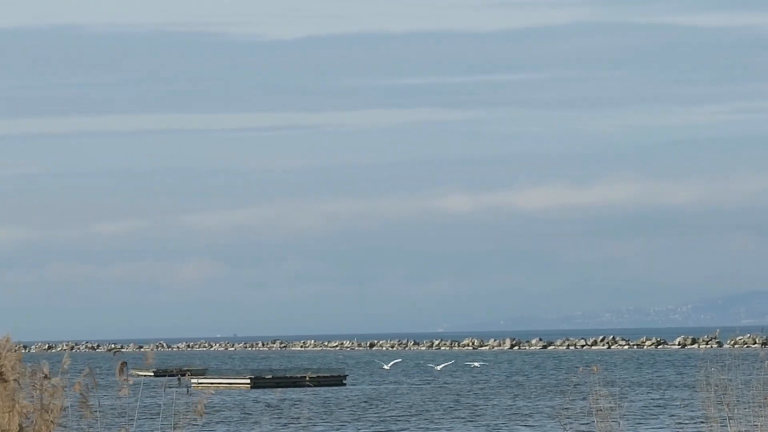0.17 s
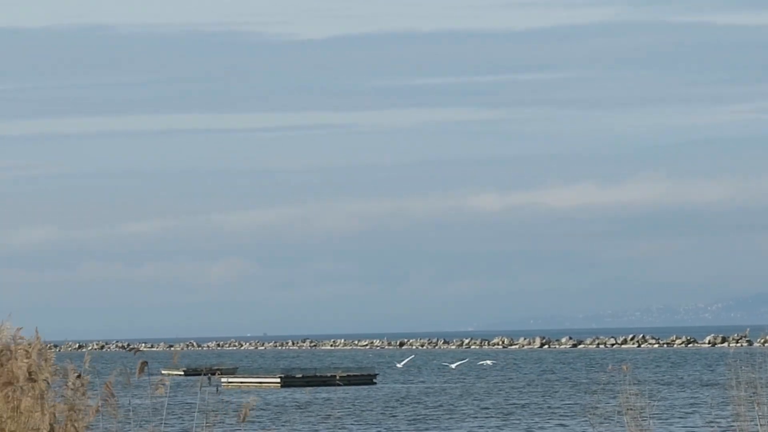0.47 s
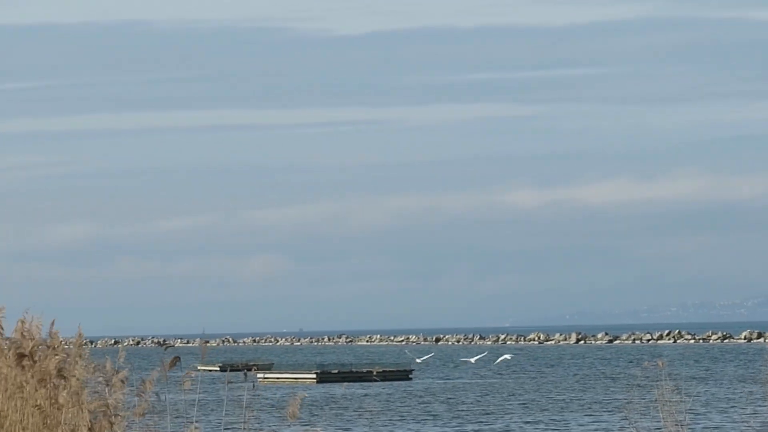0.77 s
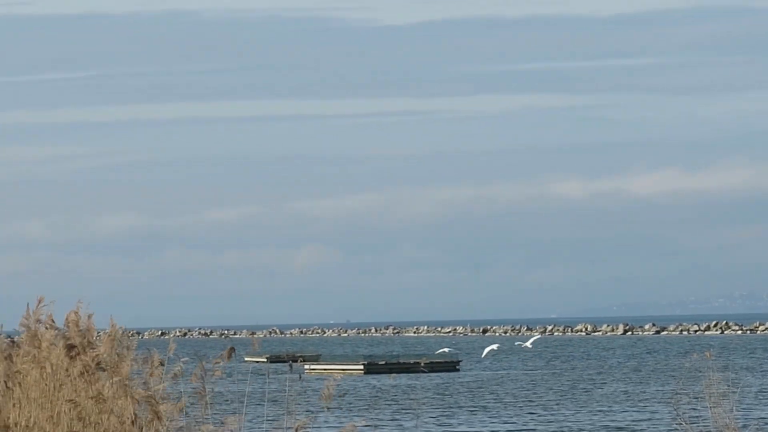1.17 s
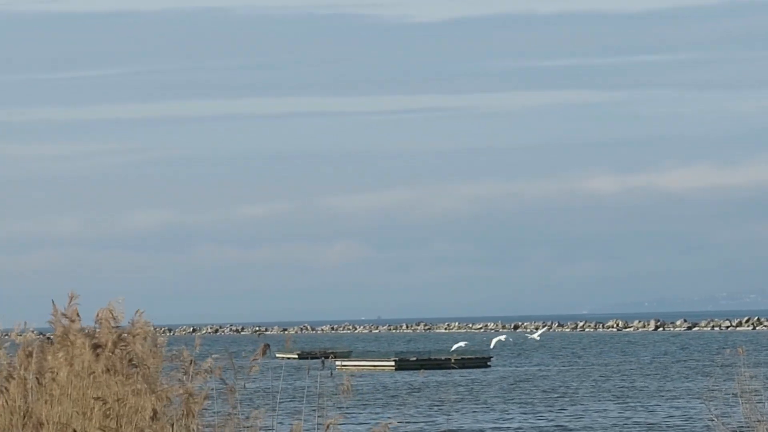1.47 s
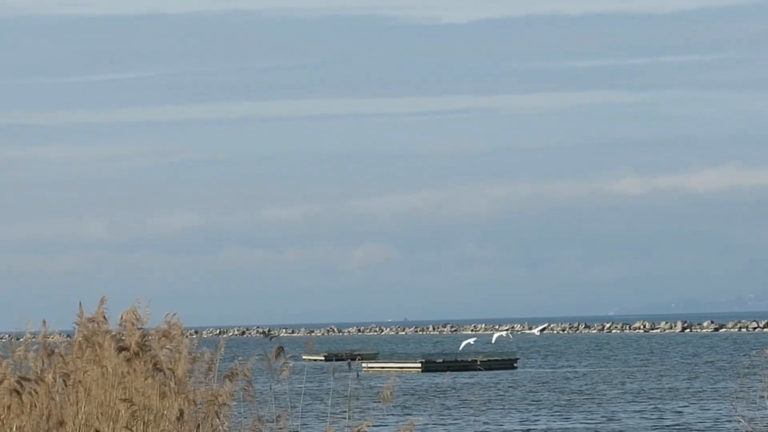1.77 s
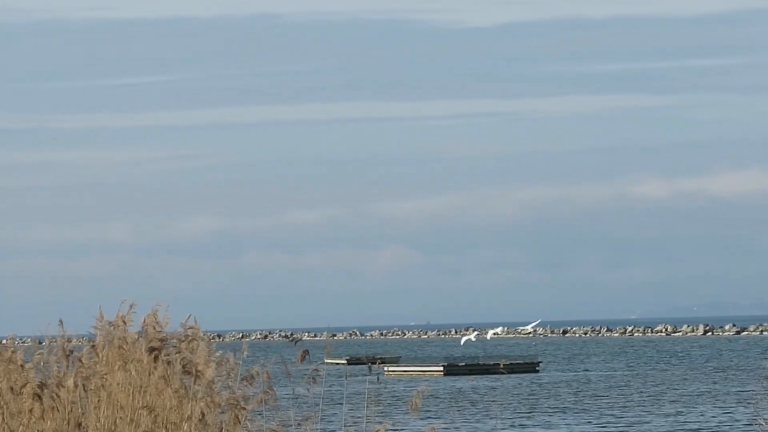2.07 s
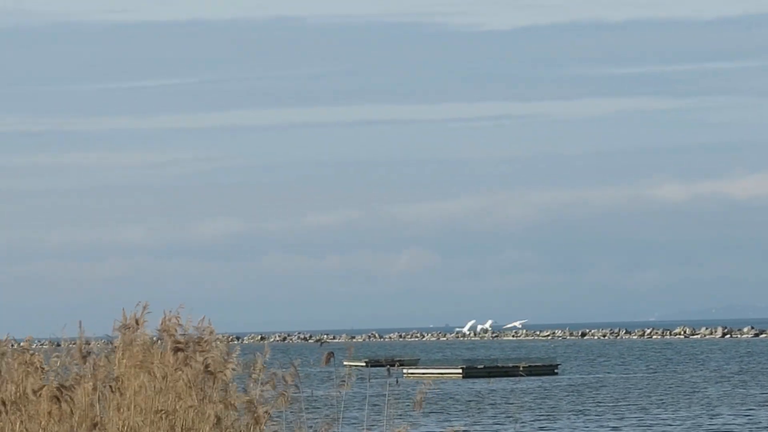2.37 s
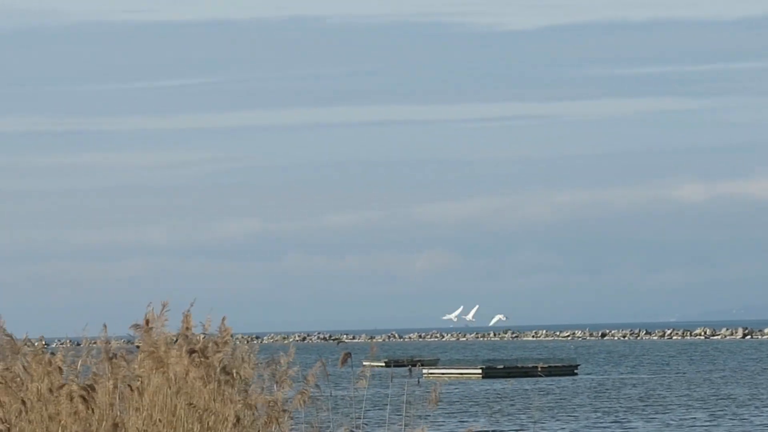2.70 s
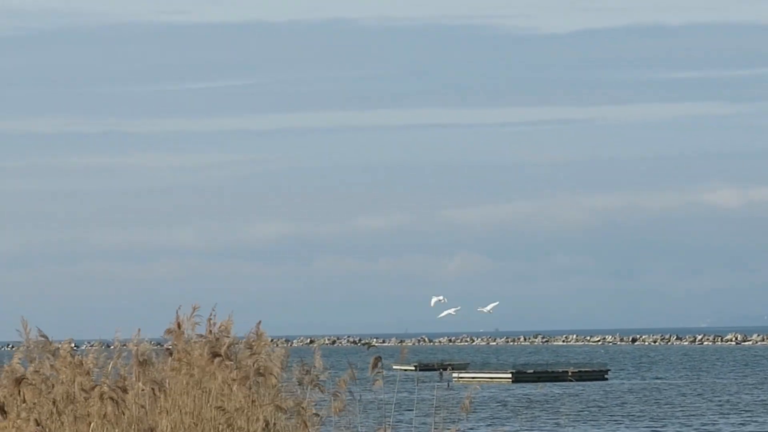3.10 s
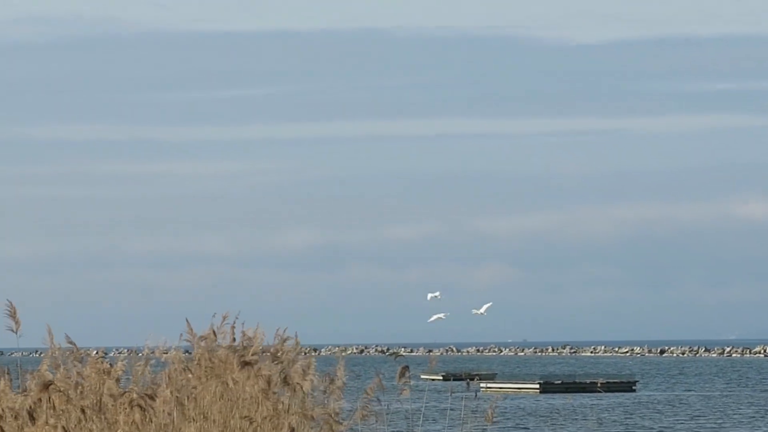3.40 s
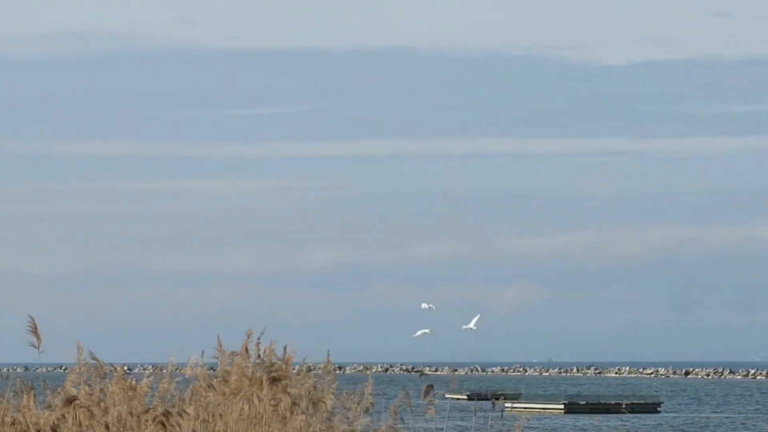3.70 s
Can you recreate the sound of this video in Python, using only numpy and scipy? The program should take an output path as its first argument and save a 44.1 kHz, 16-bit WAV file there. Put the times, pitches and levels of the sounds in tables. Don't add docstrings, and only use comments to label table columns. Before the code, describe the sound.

Wind rumbles and thumps against a small camera microphone on a lake shore, over faint buzzing

```python
import sys
import numpy as np
from scipy import signal
from scipy.fft import rfft, irfft, next_fast_len
from scipy.io import wavfile
from scipy.ndimage import uniform_filter1d, map_coordinates

SR = 44100
rng = np.random.default_rng(int(sys.argv[2]) if len(sys.argv) > 2 else 0)


def volts_from_db(level):
    exponent = np.asarray(level, float) / 20
    return 10 ** exponent


def log_audio(samples):
    frames = np.atleast_2d(samples).T
    limited = np.clip(frames, -1, 1)
    pcm = np.round(limited * 32767).astype(np.int16)
    wavfile.write(sys.argv[1], SR, pcm)


N = 169785
T = np.arange(N) / SR

# (start [s], end [s], shift to stretch time [s], gain [dB])
SHOWINGS = [
    (0, .271, 2.99998, 0),
    (.272, 1.568, 1.89998, -1.5),
    (1.472, 3.266, 0, 0),
    (2.905, 3.85, -.73333, -1.5),
]
SECOND_SHIFT_S = 1.89998
JOIN_S, FADE_FROM_S, FADE_DB_PER_S = .005, 3.62, -11.5

# (frequency [Hz], density [dB per Hz])
HISS_SPECTRUM = [(150, -120), (300, 15), (2500, -7.5), (3500, -3), (5000, -1), (9000, -4.5), (16000, -6)]
HISS_DB = -45

# (frequency [Hz], density [dB per Hz])
TWITTER_SPECTRUM = [(4300, -120), (4700, -2.5), (5100, -1), (5500, -1), (5900, -120)]
TWITTER_DB = -59.5

# (time in frame [ms], signed size [1])
FRAME_EDGES = [(0, .85), (.329, -1), (.38, .8), (.702, -.72), (.748, .88), (1.07, -.72), (1.206, 1),
               (1.665, .22), (2.11, -.16), (2.571, -.21), (3.03, -.85)]
FRAME_RATE_HZ, FRAME_START_S = 126.136, 1.65192
EDGE_DB, EDGE_SCATTER_DB, EDGE_DULL_HZ = -24.5, -2.5, 28400
BUSY_FROM_S, BUSY_TO_S, LATE_MS, LATE_SHARE = 2.535, 2.905, .113, .7

# (frequency [Hz], density [dB per Hz])
GRIP_SPECTRUM = [(250, -120), (500, 2), (950, -1), (1400, -7), (2500, -5), (2900, -16.5), (5300, -20),
                 (9000, -34), (12000, -120)]
GRIP_S, GRIP_LONG_S, GRIP_DB = 3.372, .099, -35

# (time [s], held [s], pitch [Hz], level [dB], falling tail [s])
CHIPS = [
    (1.474, .007, 3560, -46, .010),
    (1.739, .019, 3490, -44, .004),
    (2.116, .013, 3250, -51, .003),
    (2.280, .015, 3345, -46, .004),
    (2.760, .010, 3335, -43, .014),
]
CHIP_SAG_HZ_PER_S2, CHIP_SCOOP_HZ, CHIP_RISE_S = 1500000, 70, .005
CHIP_TAIL_DB_PER_S, CHIP_FLUTTER_DB = -500, 1.5

# (middle [s], length [s], level [dB])
WAVELETS = [(1.812, .03, -44.5), (1.884, .04, -43), (2.043, 0.018, -47), (2.07, 0.013, -48),
            (2.122, 0.041, -43.5), (2.181, 0.021, -42.5), (2.342, 0.038, -44.5), (2.405, 0.036, -44.5),
            (2.454, 0.03, -41.5), (2.668, 0.042, -49), (2.896, 0.029, -45.5), (2.921, .025, -42),
            (3.02, .04, -52), (3.154, 0.045, -45), (3.195, 0.033, -47), (3.248, 0.014, -40),
            (3.33, .03, -46), (3.369, .03, -37)]
# (frequency [Hz], density [dB per Hz])
SPLASH_SPECTRUM = [(500, -120), (900, 0), (1300, -1), (2100, 6.5), (2900, -6.5), (3500, -6), (4300, -13),
                   (6000, -120)]
WAVELET_LENGTH_SCALE, WAVELET_GRAIN_DB = .77, 3

# (time [s], level [dB])
WING_EFFORT = [(1.6, -40), (1.87, -38), (1.88, -37.5), (2.148, -42), (2.386, -36.5), (2.452, -41),
               (2.682, -39.5), (2.726, -40), (2.88, -42)]
# (time in the second showing [s], level [dB])
WING_EFFORT_END = [(1.0, -35.5), (1.11, -37), (1.208, -43.5), (1.258, -40), (1.274, -39.5), (1.46, -36.5)]
# (frequency [Hz], density [dB per Hz])
WASH_SPECTRUM = [(120, -40), (200, -10), (420, -8), (500, -9.5), (650, -3), (1000, -6.5), (1620, -16),
                 (3000, -28.5), (5200, -41), (8800, -120)]
# (tone [Hz], width [Hz], level [dB], a downstroke [s])
FEATHER_TONES = [
    (642.3, 40, 1, 2.364),
    (786.5, 53, -4, 2.6),
    (898, 140, -5, 2.25),
]
FEATHER_DB, FEATHER_FOLLOWS, WASH_DB, WASH_FOLLOWS = -4.5, .7, 3, .54
STROKE_S, STROKE_DEPTH_DB = .31, 4.5
SLAP_S, SLAP_LONG_S, SLAP_DB = 1.9, .027, 5

# (time [s], level [dB])
GUSTS = [(1.5, -28.5), (1.788, -25), (1.818, -26), (1.872, -26.5), (2.214, -19), (2.752, -24),
         (2.81, -17.5), (2.836, -23.5), (2.88, -23)]
# (time in the second showing [s], level [dB])
GUSTS_END = [(1.0, -12.5), (1.028, -21), (1.152, -16.5), (1.18, -18), (1.244, -16), (1.3, -19.5),
             (1.5, -27)]
# (frequency [Hz], density [dB per Hz])
RUMBLE_SPECTRUM = [(8.8, -15), (15, -1.5), (32, 0.5), (81, -3.5), (95, -3.5), (113, -11), (155, -12),
                   (213, -22.5), (400, -34.5), (520, -26), (880, -120)]
# (time [s], half length [s], swing [Hz], level [dB])
EDDIES = [(1.818, 0.079, 30.5, -27), (2.102, 0.086, 33.5, -17), (2.216, .16, 33.6, -20.5),
          (2.281, 0.15, 74.1, -25.5), (2.346, 0.096, 56.6, -29.5), (2.8, 0.049, 50.7, -26),
          (2.933, 0.17, 30.4, -20.5), (3.041, 0.12, 40.8, -23), (3.145, 0.041, 73, -17),
          (3.157, 0.088, 27.8, -21.5), (2.359, 0.065, 25.5, -24), (3.337, 0.055, 24, -21.5)]
GUST_TRIM_DB, EDDY_TRIM_DB, EVENNESS = -1.5, 2.5, .39


def unit(x):
    return x / np.sqrt(np.mean(x ** 2) + 1e-20)


def along(points, hz):
    f, v = np.transpose(points)
    return np.interp(np.log(hz + 1), np.log(f + 1), v)


def envelope_db(rows, end_rows):
    end_rows = np.add(end_rows, [SECOND_SHIFT_S, 0])
    return np.interp(T, *np.vstack([rows, end_rows]).T)


def wobble(rate_hz):
    knots = rng.standard_normal(int(N * rate_hz / SR) + 4)
    return map_coordinates(knots, [T * rate_hz])


def filtered(x, response):
    m = next_fast_len(N + 8192)
    return irfft(rfft(x, m) * response(np.fft.rfftfreq(m, 1 / SR)), m)[..., :N]


def rush(spectrum, patchy_db):
    z = signal.stft(rng.standard_normal(N + 512), nperseg=512)[2]
    field = uniform_filter1d(rng.standard_normal(z.shape), size=5, axis=0)
    field = uniform_filter1d(field, size=8, axis=1)
    x = signal.istft(z * volts_from_db(patchy_db * unit(field)), nperseg=512)[1][:N]
    return unit(filtered(x, lambda hz: volts_from_db(along(spectrum, hz))))


def hiss():
    return volts_from_db(HISS_DB) * rush(HISS_SPECTRUM, patchy_db=1.7)


def twitter():
    return volts_from_db(TWITTER_DB + 1.5 * wobble(12)) * rush(TWITTER_SPECTRUM, patchy_db=1)


def data_line():
    frame_s = FRAME_START_S + np.arange(-30, 240) / FRAME_RATE_HZ
    busy = (frame_s > BUSY_FROM_S) & (frame_s < BUSY_TO_S)
    late = busy & (rng.random(len(frame_s)) < LATE_SHARE)
    sent_s = frame_s + late * LATE_MS / 1000
    edge_ms, size = np.transpose(FRAME_EDGES)
    at = (sent_s[:, None] + edge_ms / 1000).ravel() * SR
    scatter_db = EDGE_SCATTER_DB * rng.standard_normal((len(frame_s), len(edge_ms)))
    size = (size * volts_from_db(EDGE_DB + scatter_db)).ravel()
    i = at.astype(int)[:, None] + np.arange(-15, 17)
    d = i - at[:, None]
    spikes = size[:, None] * np.sinc(d) * np.cos(np.pi * d / 34) ** 2
    leak = np.bincount(i.ravel(), spikes.ravel(), N)[:N]
    return filtered(leak, lambda hz: 1 / (1 + (hz / EDGE_DULL_HZ) ** 2))


def grip():
    u = T - GRIP_S
    slips = volts_from_db(.8 * wobble(90) + 2.5 * wobble(500))
    gate = np.clip(np.minimum(u, GRIP_LONG_S - u) / .015, 0, 1)
    return volts_from_db(GRIP_DB) * slips * gate * rush(GRIP_SPECTRUM, patchy_db=0)


def bird():
    out = np.zeros(N)
    for s, held, hz, db, tail in CHIPS:
        t = np.arange(int((held + tail + CHIP_RISE_S) * SR)) / SR
        after = np.clip(t - held, 0, None)
        sag_hz = CHIP_SAG_HZ_PER_S2 * after ** 2
        pitch_hz = hz - sag_hz - CHIP_SCOOP_HZ * np.exp(-t / CHIP_RISE_S)
        gate = np.clip(np.minimum(t, t[-1] - t) / CHIP_RISE_S, 0, 1)
        level = gate * volts_from_db(db + CHIP_TAIL_DB_PER_S * after)
        tone = np.sqrt(2) * np.sin(2 * np.pi * np.cumsum(pitch_hz) / SR)
        out[round(s * SR):][:len(t)] += level * tone
    return out * volts_from_db(CHIP_FLUTTER_DB * wobble(150))


def laps():
    s, long, db = np.transpose(WAVELETS)
    u = (T - s[:, None]) / (WAVELET_LENGTH_SCALE * long[:, None])
    puffs = volts_from_db(db) @ np.cos(np.pi / 2 * np.clip(u, -1, 1)) ** 2
    return puffs * volts_from_db(WAVELET_GRAIN_DB * wobble(250)) * rush(SPLASH_SPECTRUM, patchy_db=1)


def feather_tone(hz, width_hz, db, stroke_s):
    def resonance(f):
        return (1j * f * width_hz / (hz * hz - f * f + 1j * f * width_hz)) ** 2
    stroke_db = STROKE_DEPTH_DB * np.cos(2 * np.pi * (T - stroke_s) / STROKE_S)
    return volts_from_db(db + stroke_db) * unit(filtered(rng.standard_normal(N), resonance))


def swans():
    slap_db = SLAP_DB * np.exp(-((T - SLAP_S) / SLAP_LONG_S) ** 2)
    effort_db = envelope_db(WING_EFFORT, WING_EFFORT_END) + slap_db
    mean_db = effort_db.mean()
    swing_db = effort_db - mean_db
    wash_db = mean_db + WASH_DB + WASH_FOLLOWS * swing_db + .82 * wobble(20)
    wash = volts_from_db(wash_db) * rush(WASH_SPECTRUM, patchy_db=.5)
    feathers = unit(sum(feather_tone(*row) for row in FEATHER_TONES))
    return wash + volts_from_db(mean_db + FEATHER_DB + FEATHER_FOLLOWS * swing_db) * feathers


def eddies():
    out = np.zeros(N)
    for s, long, hz, db in EDDIES:
        u = np.clip((T - s) / long, -1, 1)
        swing = np.sin(2 * np.pi * (hz * (T - s) + rng.random()))
        out += volts_from_db(db + EDDY_TRIM_DB) * np.cos(np.pi * u / 2) ** 2 * swing
    return out


def wind():
    raw = rush(RUMBLE_SPECTRUM, patchy_db=.9)
    power = np.abs(uniform_filter1d(raw ** 2, size=3000))
    even = unit(raw / np.sqrt(power + .05) ** EVENNESS)
    return volts_from_db(envelope_db(GUSTS, GUSTS_END) + GUST_TRIM_DB) * even + eddies()


def scene():
    stretch = hiss() + twitter() + data_line() + grip() + bird() + laps() + swans() + wind()
    out = np.zeros(N)
    for start, end, shift, db in SHOWINGS:
        opening = T - start + JOIN_S / 2 * (start == 0)
        gate = np.clip(np.minimum(opening, end - T) / JOIN_S, 0, 1)
        out += volts_from_db(db) * gate * np.roll(stretch, -round(shift * SR))
    fade_db = FADE_DB_PER_S * np.clip(T - FADE_FROM_S, 0, None)
    return (out * volts_from_db(fade_db))[None]


def roll_off(x):
    return signal.sosfilt(signal.butter(12, 16300, fs=SR, output="sos"), x)


def record(dry):
    top_hz = 15780
    mix = filtered(dry, lambda hz: hz < top_hz)
    return roll_off(mix)


dry = scene()
out = record(dry)
log_audio(out)
```